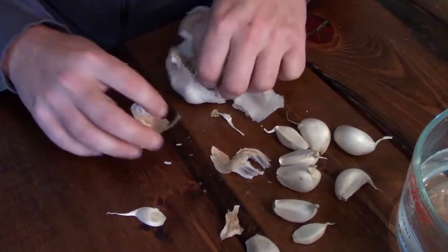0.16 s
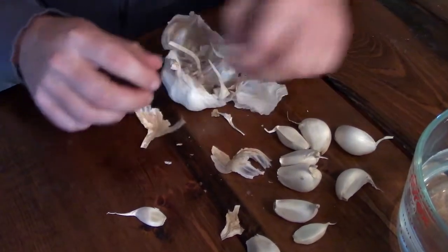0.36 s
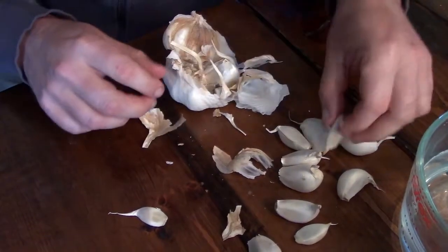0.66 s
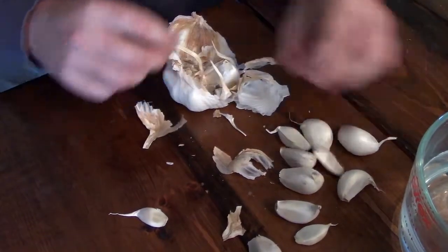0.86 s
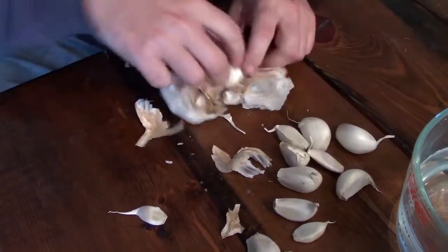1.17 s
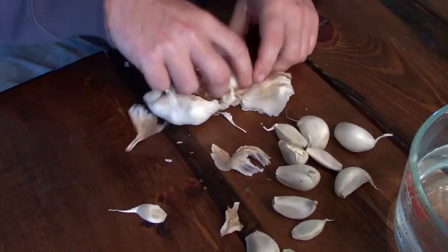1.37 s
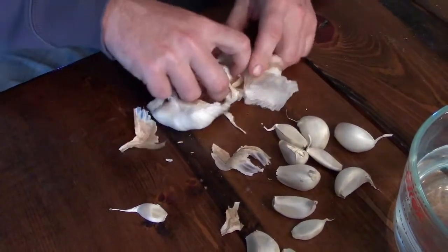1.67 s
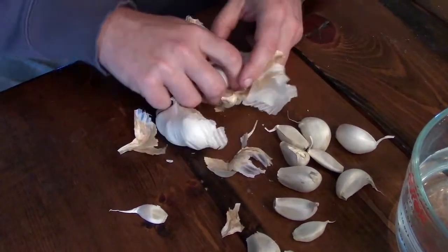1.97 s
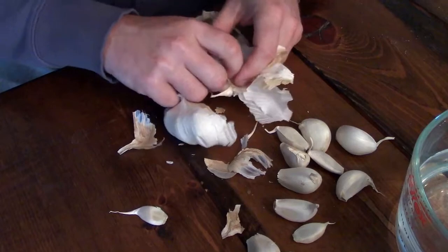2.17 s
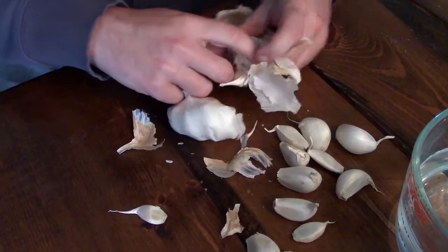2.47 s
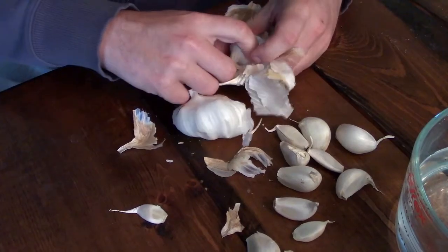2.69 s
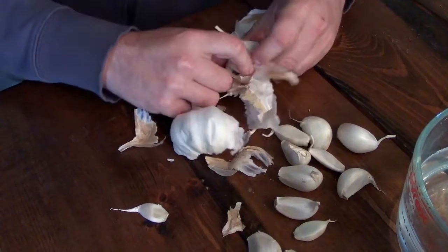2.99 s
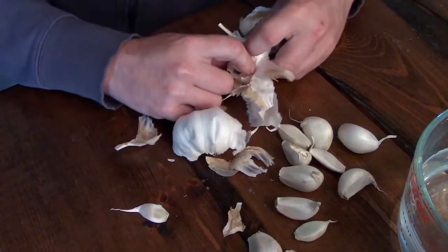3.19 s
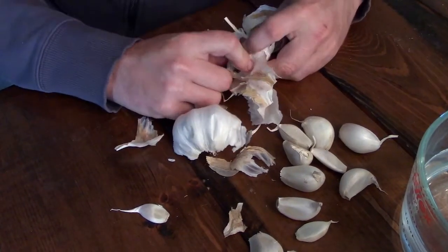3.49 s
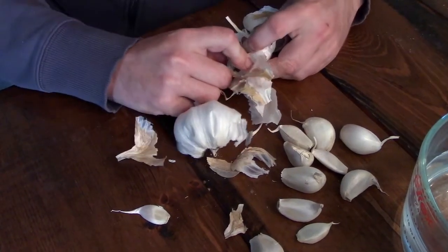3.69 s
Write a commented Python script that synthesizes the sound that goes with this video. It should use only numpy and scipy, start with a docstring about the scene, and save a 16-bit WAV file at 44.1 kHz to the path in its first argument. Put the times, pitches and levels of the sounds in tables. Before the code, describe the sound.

Fingers peel a dry garlic bulb close by, the papery skin crinkling with a few light snaps. In a lull, at 0.7 seconds, a clove drops on the wooden table. From 1 second the skin tears harder, with sharp snaps and two dull cracks. Near 3 seconds the bulb clicks on the wood, the loudest snaps follow, and crinkling continues to the end over a faint appliance hum.

```python
"""Fingers peel a dry garlic bulb on a wooden table, close by, over an appliance's hum and quiet room noise.
First the papery skin crinkles in dense tiny cracks and gives a few light snaps. In a lull, at 0.7 s,
a clove drops and sets the modes of the table ringing. From 1 s on the skin tears in earnest, with sharp
snaps and two dull cracks of stem and cloves. Near 3 s the bulb knocks on the wood with a hard click;
the loudest snaps follow, and the crinkling goes on to the end."""
import sys
import numpy as np
from scipy import signal
from scipy.fft import rfft, irfft
from scipy.io import wavfile

SR = 44100
rng = np.random.default_rng(int(sys.argv[2]) if len(sys.argv) > 2 else 0)


def unload_audio(sound):
    """Save the sound as a 16-bit wav file, at the path given as the first command line argument."""
    columns = np.transpose(np.atleast_2d(sound))
    # keep every value between -1 and 1, then stretch to whole-number steps
    steps = np.round(np.clip(columns, -1, 1) * 32767)
    wavfile.write(sys.argv[1], SR, steps.astype(np.int16))


N = 169785


def from_db(db):
    """Amplitude ratio of a level: a factor of ten per 20 dB."""
    return 10 ** (np.asarray(db) / 20)


def unit_rms(x):
    """Normalisation to unit mean power."""
    return x / np.sqrt(np.mean(x ** 2) + 1e-20)


def at_hz(points, hz):
    """Interpolation of a table on a logarithmic frequency axis."""
    freqs, values = np.transpose(points)
    return np.interp(np.log(hz), np.log(freqs), values)


def butterworth(x, order, hz, kind="low"):
    """Filtering with a maximally flat passband."""
    return signal.sosfilt(signal.butter(order, hz, kind, fs=SR, output="sos"), x)


def drift(corner_hz):
    """Random modulation: low-passed Gaussian noise of unit rms."""
    step, settle = 40, 2000
    pole = np.exp(-2 * np.pi * corner_hz * step / SR)
    noise = rng.standard_normal(N // step + settle + 2)
    slow = signal.lfilter([1], [1, -2 * pole, pole * pole], noise)[settle:]
    return np.interp(np.arange(N) / step, np.arange(len(slow)), unit_rms(slow))


def resonator(force, hz, t60):
    """Damped harmonic oscillator: a unit impulse starts a decaying sine of unit amplitude."""
    r, w = from_db(-60 / (t60 * SR)), 2 * np.pi * hz / SR
    return signal.lfilter([0, np.sin(w)], [1, -2 * r * np.cos(w), r * r], force + 1e-18)


# Spectrum of the room noise: f/Hz, relative spectral level/dB
AIR_SPECTRUM = [(40, -16), (109, -5.5), (364, 3.5), (780, -4.5), (1910, -14.5), (4400, -17), (9460, -22.5),
                (16000, -35)]
# Likeness of its left and right channels: f/Hz, correlation coefficient
AIR_CORRELATION = [(40, 0.26), (150, 0.49), (400, 0.76), (2000, 0.99)]
def room_noise(level_db=-53.5):
    """Partial coherence: mid and side noise mix into a stereo field that is widest in the bass."""
    hz = np.maximum(np.arange(N // 2 + 1) * SR / N, 10)
    correlation = np.clip(at_hz(AIR_CORRELATION, hz), 0, 1)
    mid, side = rfft(rng.standard_normal((2, N))) * from_db(at_hz(AIR_SPECTRUM, hz))
    left_right = np.sqrt(1 + correlation) * mid + np.sqrt(1 - correlation) * side * [[1], [-1]]
    return from_db(level_db) * unit_rms(irfft(left_right, N))


# Overtones of the 60 Hz mains: f/Hz, rms level/dB
MAINS_HARMONICS = [(120, -70.5), (180, -71), (240, -68.5), (360, -65.5), (780, -66)]
def appliance_hum(waver_db=3.6, waver_hz=6.0):
    """Harmonic series: each mains overtone wavers under its own slow amplitude modulation."""
    t = np.arange(N) / SR
    out = np.zeros(N)
    for hz, db in MAINS_HARMONICS:
        amplitude = np.sqrt(2) * from_db(db + waver_db * drift(waver_hz))
        out += amplitude * np.sin(2 * np.pi * (hz * t + rng.random()))
    return out


def reverberation(direct, t60=0.2, wall_cut_hz=4000, level_db=-16.5):
    """Diffuse reflection: convolution with dull, exponentially decaying noise that starts after 4 ms."""
    t = np.arange(SR // 2) / SR
    tail = rng.standard_normal(len(t)) * from_db(-60 * t / t60) * (t > 0.004)
    tail = butterworth(tail, 1, wall_cut_hz)
    return from_db(level_db) * signal.fftconvolve(direct, tail / np.sqrt(np.sum(tail ** 2)))[:N]


# Impacts of clove and bulb on the table: t/s, impulse level/dB
IMPACTS = [(0.727, -18), (0.733, -5.5), (0.757, -20), (0.872, -19.5), (2.952, -18), (3.001, -22.5),
           (3.093, -24)]
# Modes of the table top: f/Hz, relative level/dB, T60/s
TABLE_MODES = [(203, -34, 0.058), (375, -12.5, 0.023), (541.5, -16, 0.063), (682, -10.5, 0.038),
               (830, -11, 0.012), (1210, -9.5, 0.0071)]
def table_knocks(contact_hz=1300, rocks_per_s=950, rock_db=-16.5, rock_t60=0.34):
    """Modal superposition: each impact, and the dying rocking after it, excites the table top."""
    times, levels = np.transpose(IMPACTS)
    hits = np.zeros(N)
    hits[(times * SR).astype(int)] = from_db(levels)
    fading = signal.lfilter([from_db(rock_db)], [1, -from_db(-60 / (rock_t60 * SR))], hits + 1e-18)
    rocking = fading * (rng.random(N) < rocks_per_s / SR) * rng.standard_normal(N)
    wood = sum((-1) ** k * from_db(db) * resonator(hits + rocking, hz, t60)
               for k, (hz, db, t60) in enumerate(TABLE_MODES))
    return butterworth(wood, 1, contact_hz)   # a soft contact excites little treble


def cracks(spectrum, cycles, effort_db, patches):
    """Shot noise: random fractures and smooth fingertip friction excite damped patches of skin."""
    base_per_s, size_spread_db, rub_db = 7000, 4.5, -8
    clump_db, clump_hz, patch_db, patch_hz = 3.5, 30, 2, 20.8
    crowding_db = 0.6 * effort_db   # harder tearing packs the cracks closer
    tilt_db_per_octave = 0.095 * np.maximum(effort_db, 0)   # and brightens them above 4 kHz
    sizes = from_db(size_spread_db * np.minimum(rng.exponential(1, N), 3.8)) * rng.choice([-1, 1], N)
    rate = base_per_s * from_db(crowding_db + clump_db * drift(clump_hz))
    impulses = sizes * (rng.random(N) < rate / SR)
    impulses *= from_db(-crowding_db / 2)   # crowding leaves the mean power unchanged
    struck_patch = rng.integers(0, patches, N)
    force = unit_rms(impulses) + from_db(rub_db) * rng.standard_normal(N)
    out = np.zeros(N)
    for k, hz in enumerate(np.geomspace(spectrum[0][0] + 200, spectrum[-1][0], patches)):
        brightening_db = tilt_db_per_octave * max(np.log2(hz / 4000), 0)
        db = at_hz(spectrum, hz) + brightening_db + patch_db * drift(patch_hz)   # patches come and go
        t60 = cycles / hz
        ringing = resonator(resonator(force * (struck_patch == k), hz, t60), hz, t60)
        out += from_db(db) * hz ** 2 * ringing   # hz ** 2 offsets the two resonators' gain
    return unit_rms(out)


# Bright cracks of the skin: f/Hz, relative spectral level/dB
BRIGHT_SPECTRUM = [(1060, 1), (1800, -11.5), (2980, 1.5), (4700, -3.5), (9770, -0.5), (13700, -22.5),
                   (16000, -76)]
# Dull cracks of the flesh: f/Hz, relative spectral level/dB
DULL_SPECTRUM = [(400, -23), (900, 7.5), (1400, -4.5), (2200, 8)]
# Course of the peeling: t/s, bright level/dB, dull level/dB re bright
PEELING = [(0.0, -47, -23), (0.052, -36, -13.5), (0.101, -43, -5.5), (0.169, -35, -7), (0.274, -41.5, -6),
           (0.317, -33, -19), (0.36, -78, 19), (0.53, -55.5, -1), (0.65, -80.5, 13.5), (0.851, -56, -6),
           (1.02, -79, 13), (1.052, -34.5, -4.5), (1.119, -36.5, -7.5), (1.199, -26, -12),
           (1.267, -33, -14), (1.351, -25, -3), (1.413, -37.5, -3), (1.5, -33, -6), (1.761, -35.5, -9),
           (1.801, -26, -9), (1.851, -18, -13.5), (1.879, -32.5, -8.5), (1.981, -34.5, -8),
           (2.043, -28, -12), (2.117, -23.5, -14), (2.148, -32, -16), (2.3, -33, -14.5),
           (2.532, -34.5, -8.5), (2.61, -41, -7), (2.699, -34.5, -7), (2.87, -30, -11), (2.92, -33, -10.5),
           (3.14, -38, -9), (3.264, -27, -37), (3.322, -38.5, -10.5), (3.46, -45.5, -6),
           (3.549, -36.5, -19), (3.68, -36.5, -8), (3.822, -32.5, -14)]
def crinkle():
    """Acoustic emission: bright and dull cracks grow louder and denser as the fingers work harder."""
    t = np.arange(N) / SR
    times, bright_levels, dull_levels = np.transpose(PEELING)
    level_db = np.interp(t, times, bright_levels)
    dull_db = np.interp(t, times, dull_levels)
    effort_db = level_db - np.median(level_db)
    bright = cracks(BRIGHT_SPECTRUM, cycles=6.35, effort_db=effort_db, patches=18)
    dull = cracks(DULL_SPECTRUM, cycles=4.94, effort_db=effort_db, patches=10)
    return from_db(level_db) * (bright + from_db(dull_db) * dull)


# Single snaps of skin: t/s, peak level/dB, ringing f/Hz
SKIN_SNAPS = [(0.0328, -21, 2930), (0.165, -21, 3860), (0.2209, -14, 4040), (0.3068, -18, 3700),
              (0.3164, -9.5, 9000), (0.7353, -24.5, 3040), (0.7674, -31, 3560), (1.063, -13, 8500),
              (1.1678, -7.5, 9900), (1.203, 0.5, 8500), (1.3183, -9.5, 3520), (1.3489, 0.5, 2800),
              (1.471, -12, 1720), (1.5009, -7, 3100), (1.5605, -11.5, 5950), (1.66, -6.5, 7200),
              (1.7746, -10.5, 4600), (1.819, -11, 7010), (1.849, -9, 8000), (1.8628, -5, 9800),
              (1.9582, -6.5, 8150), (2.05, -6, 8700), (2.0963, -19, 8000), (2.122, -5, 7360),
              (2.2702, -6.5, 5830), (2.3089, -10, 5960), (2.392, -11.5, 8900), (2.4179, -12, 7960),
              (2.48, -14.5, 10400), (2.6484, -14.5, 1690), (2.7069, -2, 4940), (2.7701, 1, 9600),
              (2.8141, -10.5, 4000), (2.8656, -10.5, 9000), (2.8774, -7.5, 9440), (2.9738, -7.5, 2690),
              (3.043, -5, 1940), (3.1074, -13, 4330), (3.1692, -7, 3780), (3.182, -13, 2680),
              (3.2215, 2, 3700), (3.255, 2.5, 8100), (3.2666, -7, 9200), (3.2945, -2, 8550),
              (3.3642, -18, 10000), (3.4084, -19.5, 7740), (3.4345, -17.5, 9300), (3.47, -12.5, 4160),
              (3.52, -10, 3100), (3.5453, -10.5, 4070), (3.5644, -5, 5700), (3.602, -5.5, 6700),
              (3.6351, -13, 7100), (3.708, -10, 6360), (3.771, -8, 4080)]
# Dull cracks of stem and cloves, and the hard click of the bulb knocking on the wood:
# t/s, peak level/dB, ringing f/Hz
DULL_CRACKS_AND_CLICK = [(1.195, -12, 880), (1.347, -5.5, 980), (2.952, -15, 1300)]
def snaps(burst_t60=0.0042, tail_t60=0.019, tail_db=-3, ring_cycles=11):
    """Transient excitation: a sharp burst with a strong, quickly dying tail, part broadband, part ringing."""
    low_hz, high_hz, broadband_db = 2380, 10000, 2
    length = 2000
    t = np.arange(length) / SR
    envelope = from_db(-60 * t / burst_t60) + from_db(tail_db - 60 * t / tail_t60)
    out = np.zeros(N + length)
    for onset, db, hz in SKIN_SNAPS + DULL_CRACKS_AND_CLICK:
        noise = rng.standard_normal(length)
        noise[0] = 4.5   # sharp leading edge
        burst = noise * envelope
        ringing = unit_rms(resonator(np.diff(burst, prepend=0), hz, ring_cycles / hz))
        broadband = unit_rms(butterworth(burst, 2, [low_hz, high_hz], "band"))
        brightness = from_db(broadband_db) * min(hz / low_hz, 1) ** 2   # low snaps are duller
        snap = ringing + brightness * broadband
        start = int(onset * SR)
        out[start:start + length] += from_db(db) * snap / np.abs(snap).max()
    return out[:N]


def scene():
    """Superposition: centred direct sound, cut in the bass, adds to its reverberation and the background."""
    direct = butterworth(crinkle() + snaps() + table_knocks(), 3, 195, "high")
    return direct + reverberation(direct) + appliance_hum() + room_noise()


def record(dry, full_scale=0.93, cutoff_hz=16300):
    """Saturation and band limiting: the loudest snaps clip, leaving a faint thump; the top is cut."""
    clipped = butterworth(np.clip(dry, -full_scale, full_scale), 1, 15, "high")
    return signal.sosfilt(signal.cheby2(18, 60, cutoff_hz, fs=SR, output="sos"), clipped)


dry = scene()
out = record(dry)
unload_audio(out)
```